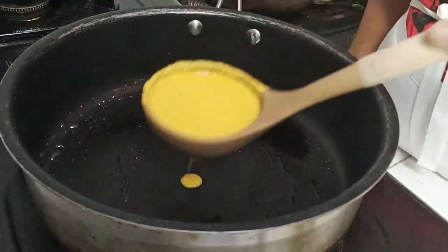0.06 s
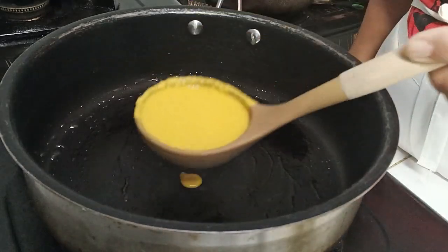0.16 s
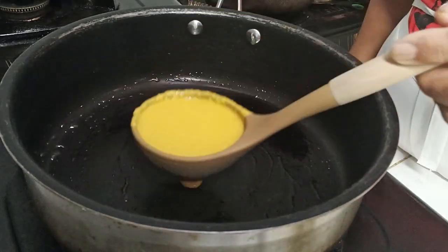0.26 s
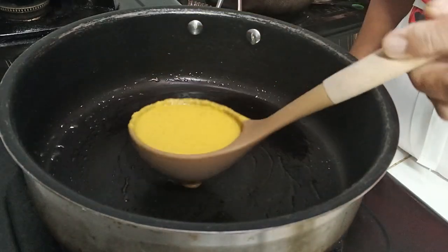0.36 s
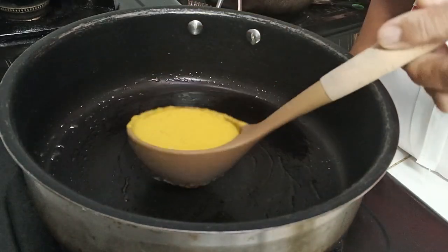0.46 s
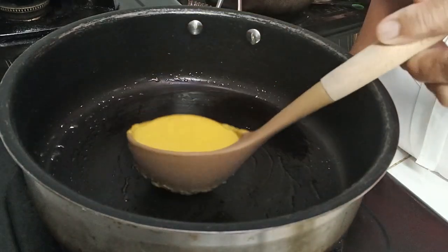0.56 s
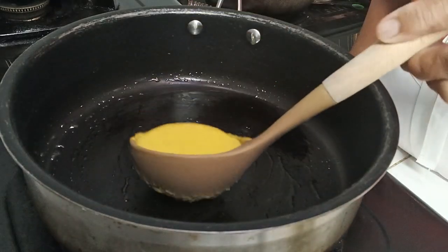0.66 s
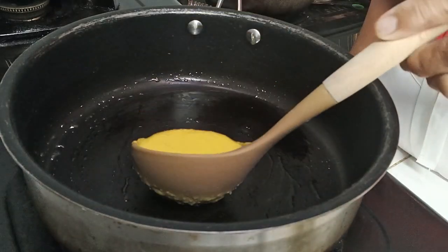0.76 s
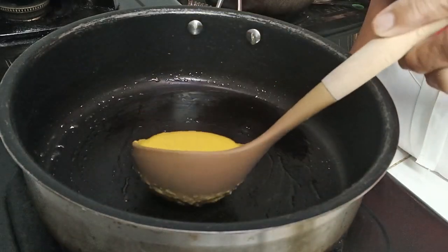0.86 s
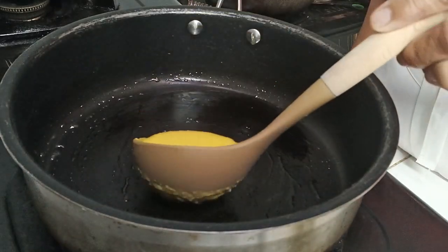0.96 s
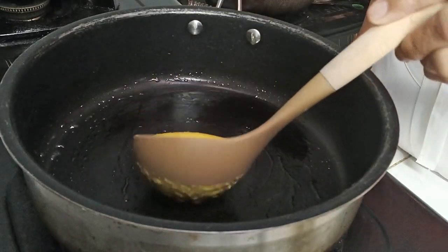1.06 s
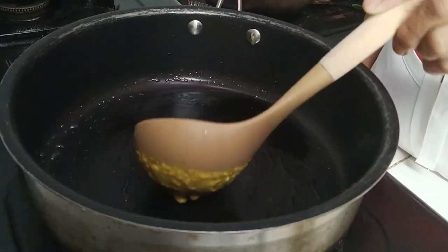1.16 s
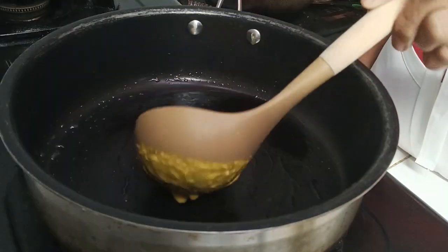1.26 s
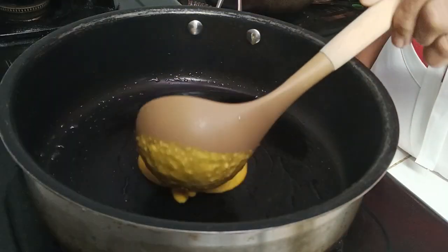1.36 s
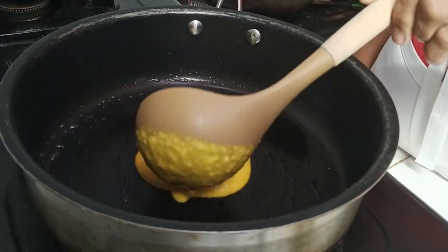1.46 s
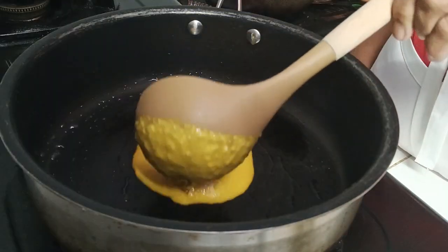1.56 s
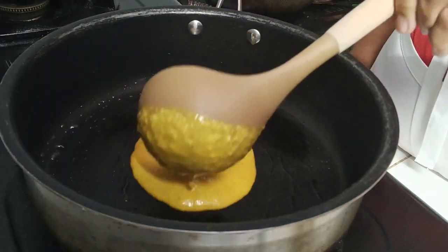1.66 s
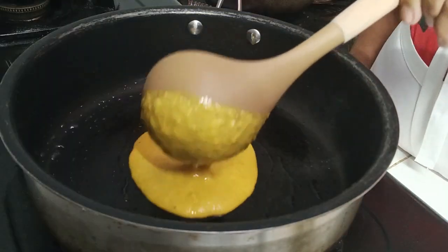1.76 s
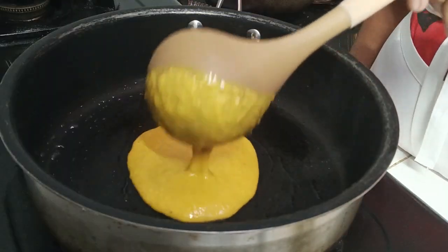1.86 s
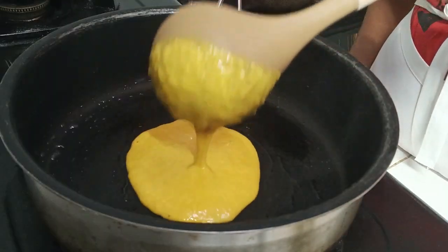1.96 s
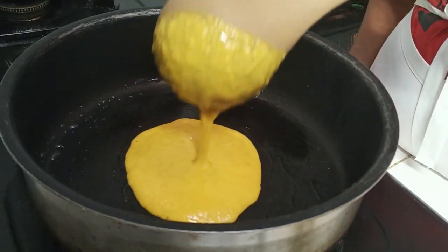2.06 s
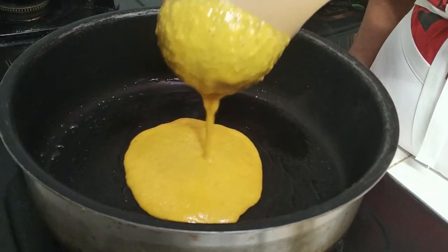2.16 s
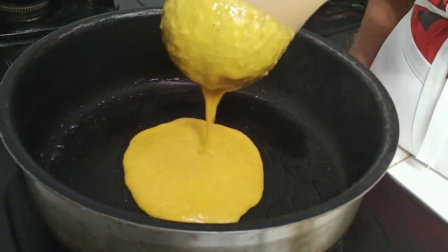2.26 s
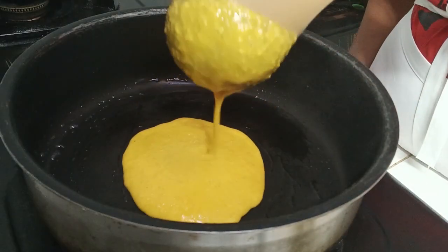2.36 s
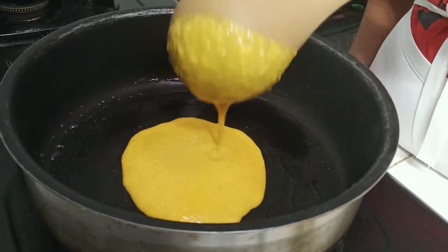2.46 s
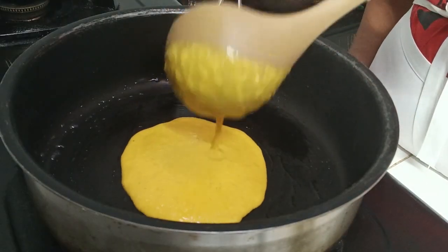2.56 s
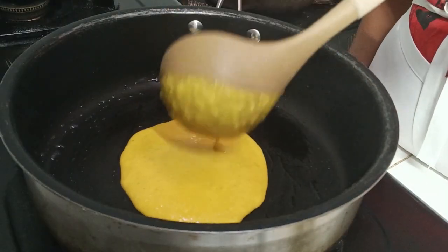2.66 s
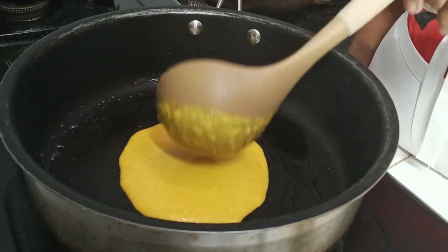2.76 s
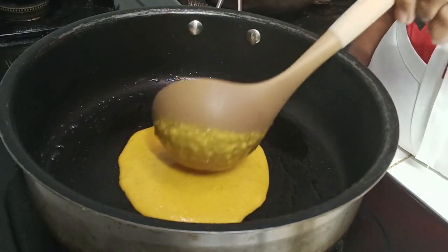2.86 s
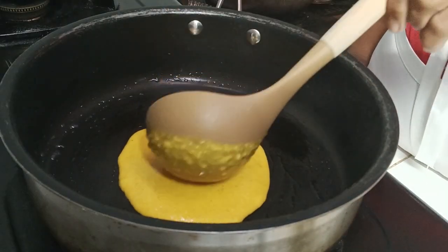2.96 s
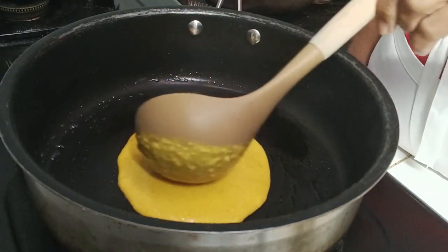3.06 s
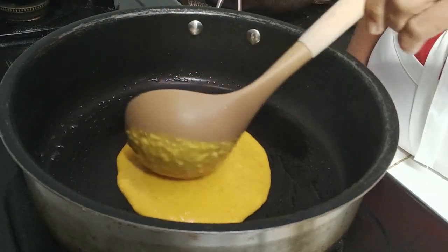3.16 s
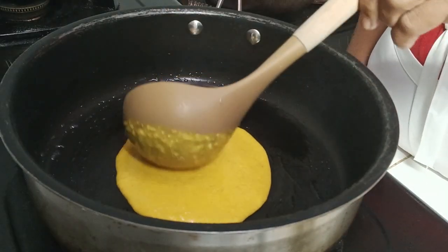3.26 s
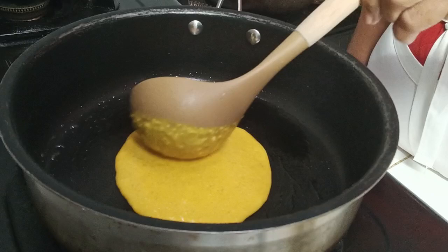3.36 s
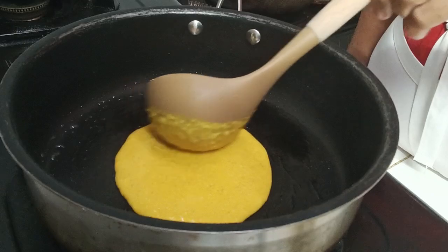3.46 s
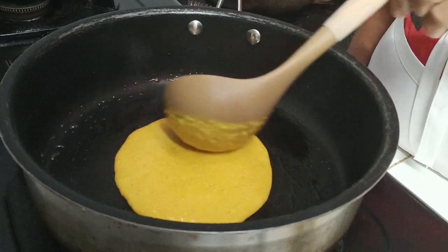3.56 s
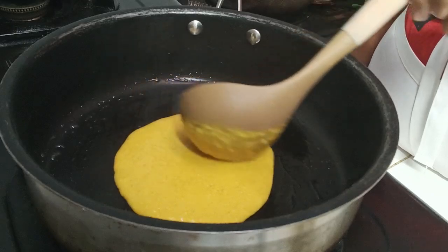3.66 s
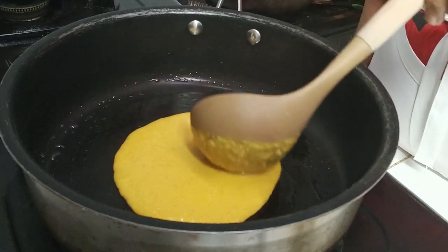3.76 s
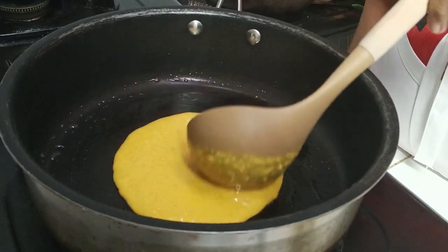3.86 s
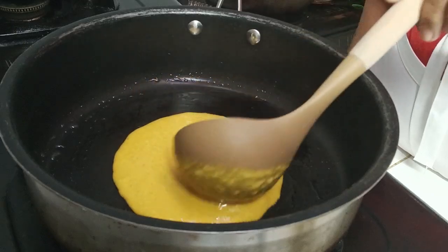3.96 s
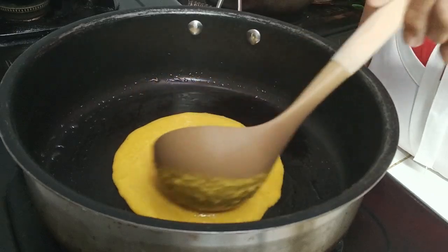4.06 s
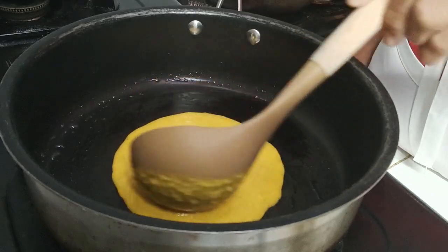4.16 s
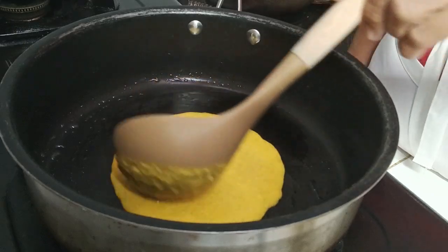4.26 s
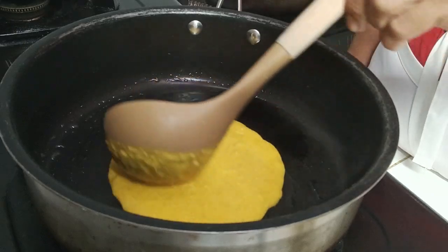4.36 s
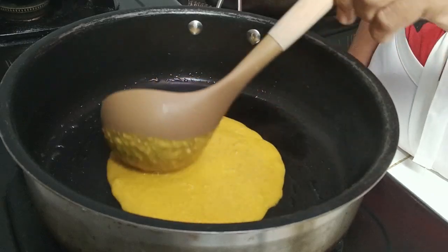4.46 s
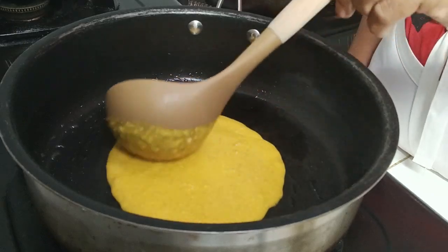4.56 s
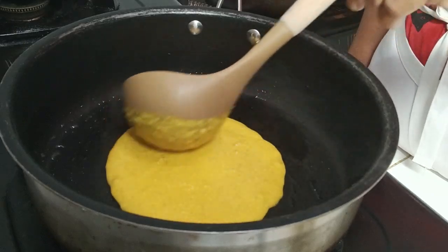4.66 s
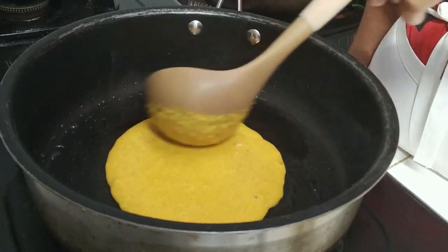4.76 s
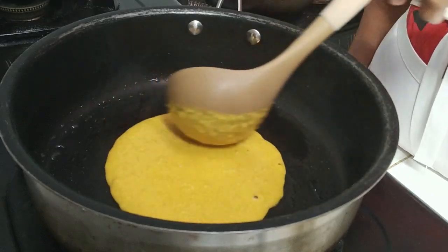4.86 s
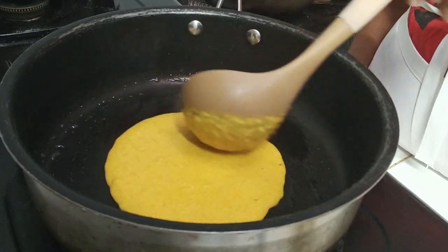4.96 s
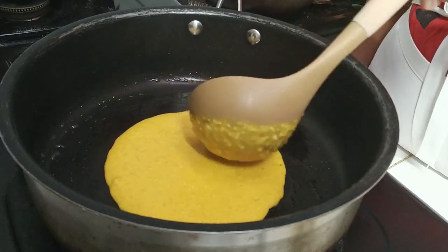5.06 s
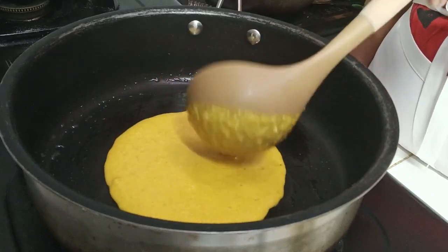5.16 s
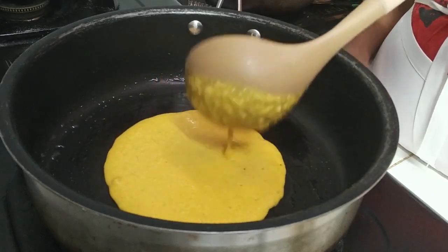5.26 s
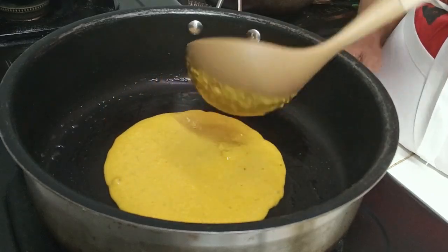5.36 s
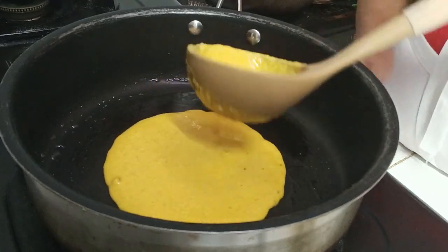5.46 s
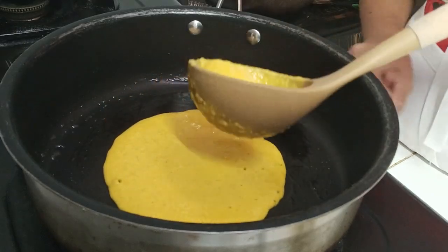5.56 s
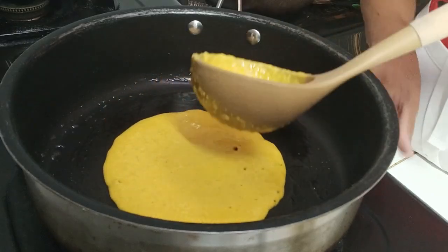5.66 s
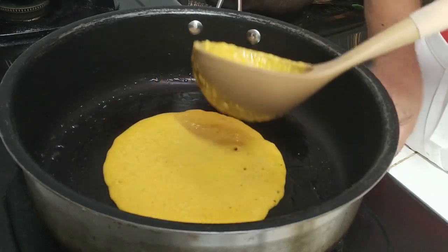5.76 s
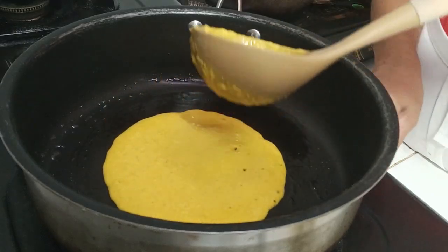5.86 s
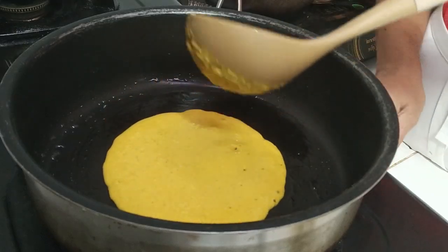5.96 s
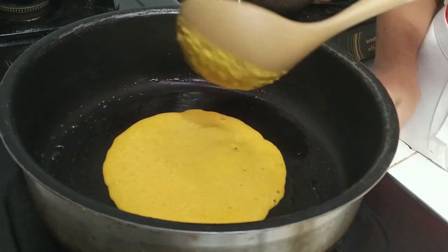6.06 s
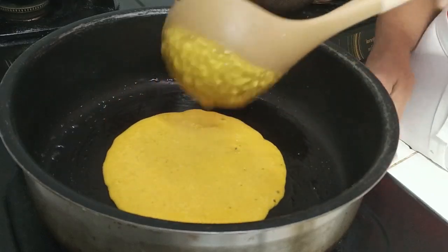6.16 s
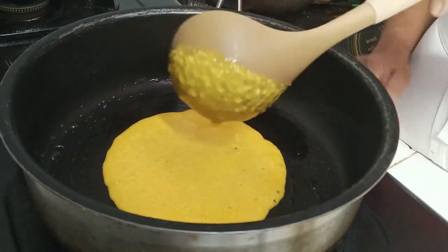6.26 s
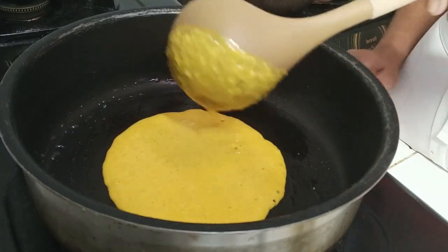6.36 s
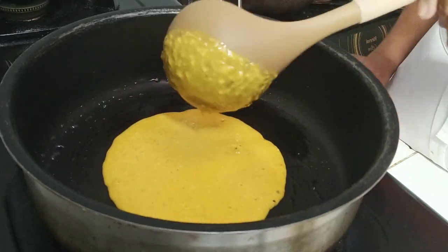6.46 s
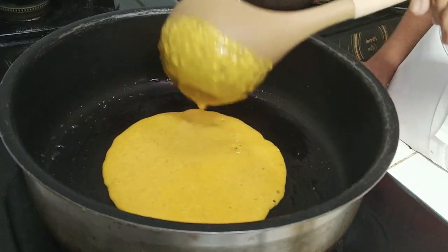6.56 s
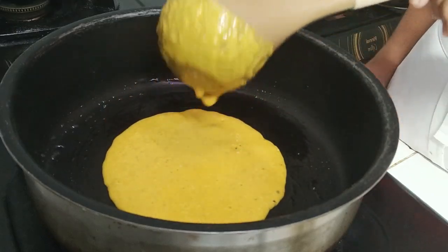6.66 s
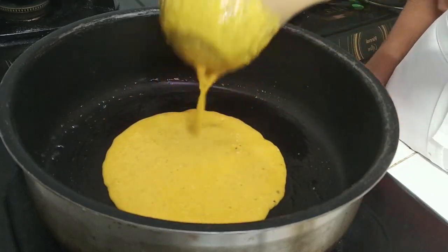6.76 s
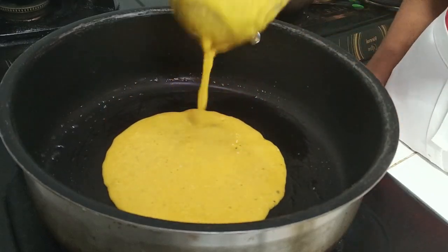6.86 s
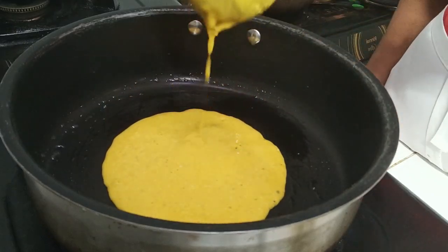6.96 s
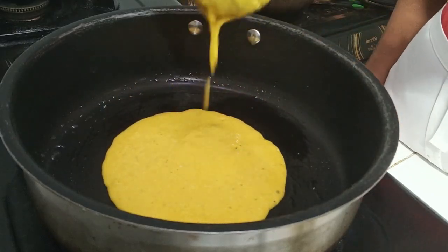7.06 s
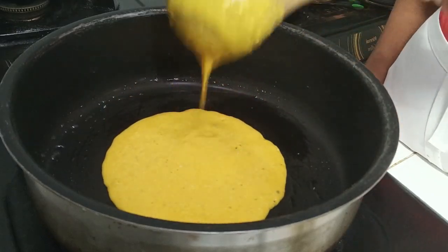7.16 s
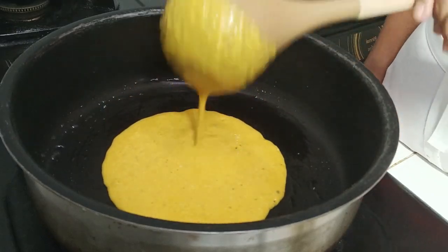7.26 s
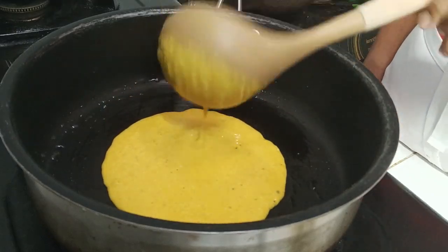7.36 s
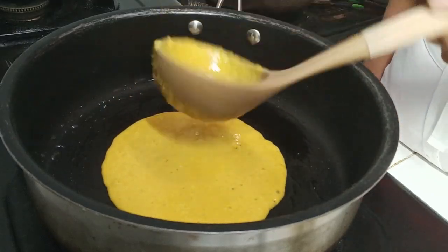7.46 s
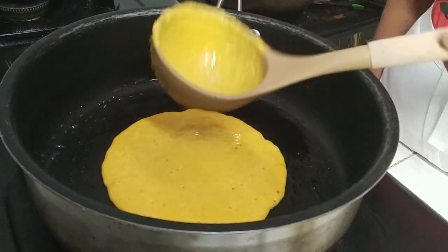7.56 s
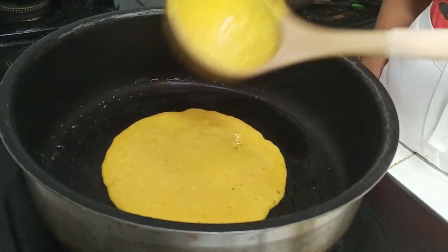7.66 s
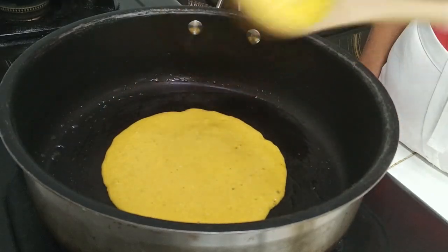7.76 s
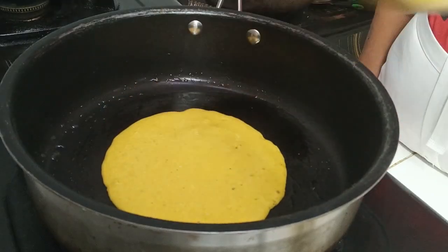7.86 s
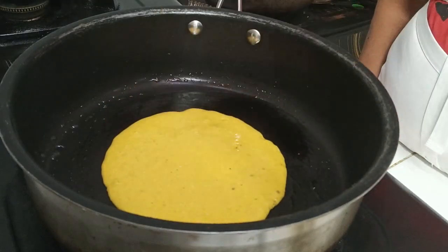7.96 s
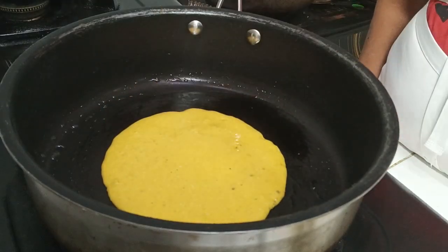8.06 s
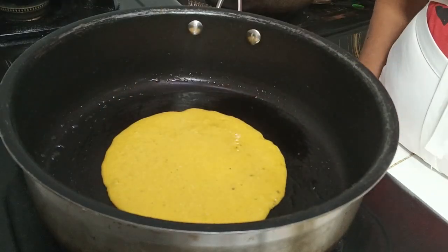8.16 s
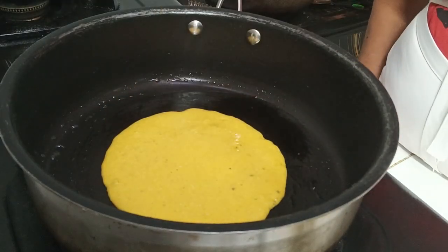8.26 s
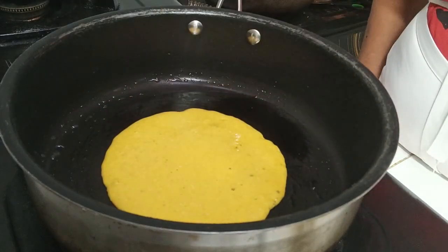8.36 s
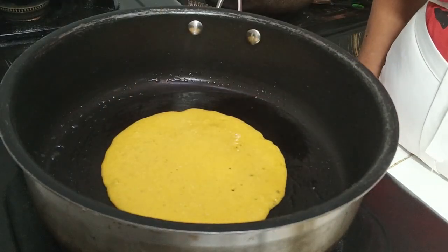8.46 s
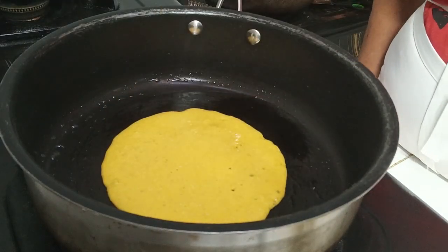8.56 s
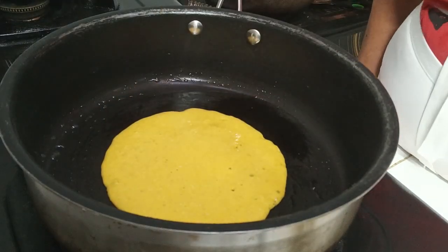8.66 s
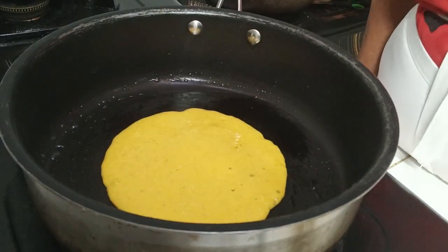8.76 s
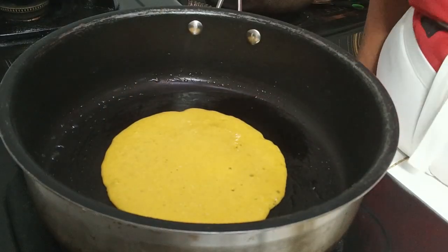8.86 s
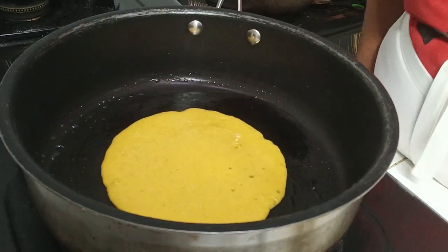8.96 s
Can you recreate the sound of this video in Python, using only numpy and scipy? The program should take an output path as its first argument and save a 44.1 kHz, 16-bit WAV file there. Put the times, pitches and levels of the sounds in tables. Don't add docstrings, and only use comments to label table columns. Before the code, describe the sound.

Close, bright frying: a ringing drip hiss, a louder muffled surge as batter lands, then long crackling fizz over a faint distant motorbike.

```python
import sys
import numpy as np
from scipy import signal
from scipy.fft import rfft, irfft
from scipy.io import wavfile
from scipy.ndimage import uniform_filter1d

SR = 44100
rng = np.random.default_rng(int(sys.argv[2]) if len(sys.argv) > 2 else 0)


def voltage_ratio(decibels):
    exponent = np.asarray(decibels, float) / 20
    return 10 ** exponent


def master(y):
    cut = np.clip(np.atleast_2d(y).T, -1, 1)
    pcm = np.round(cut * 32767)
    wavfile.write(sys.argv[1], SR, pcm.astype(np.int16))


N = 397202
T = np.arange(N) / SR

# pitch_hz, level_db (per Hz)
ROOM_RUMBLE = [(15, -42), (25, -21), (43, -7), (113, 3.5), (205, 3), (303, -7.5), (394, -9), (452, -14.5),
               (500, -1), (650, -43), (1100, -120)]
# start_s, firing_hz, level_db
MOTORBIKE = [(0, 17.7, -64.5), (4.1, 21.6, -80), (4.4, 23, -62), (4.75, 23, -78), (5.9, 21.3, -60.5),
             (6.1, 25, -60.5), (6.6, 22, -62), (6.75, 20.7, -73), (7.5, 21.7, -64.5), (8, 24, -63.5),
             (8.6, 22, -52.5), (8.78, 25, -58), (9.01, 24.8, -54)]
# multiple of the firing rate, level_db
MOTORBIKE_TONES = [(4, -6.5), (5, 0), (6, 1.5), (8, -11)]
# pitch_hz, level_db
LEFT_COLOUR = [(200, -12.5), (320, -19.5), (480, -15.5), (650, -6), (1000, -15.5), (1300, -3.5),
               (1800, -3.5), (2500, -1), (4000, -2.5), (6500, -1), (7600, -9.5), (10300, -14),
               (12400, -7.5), (13900, -6)]
RIGHT_COLOUR = [(200, -31), (430, -17.5), (620, -13.5), (1500, -10), (2600, -4), (3500, -12), (5000, 1),
                (6600, 14), (7500, 6.5), (8300, -5.5), (10500, -10.5), (13700, -11)]
# pitch_hz, left_db, right_db
PORT_PEAK = [(14250, 1, 4), (14650, 10, 14)]
# pitch_hz, width_hz, level_db (re the direct sound)
BOWL_AIR = [(406.7, 24, 3), (835, 40, -1), (1215, 45, -3), (2760, 40, -4)]
PAN_PITCHES = [1017, 1287, 2094, 2160, 2538, 2640, 2783, 3030, 3690, 3822, 4265, 4543, 4920, 5480, 5740,
               5890, 7070]
# level_db, fade_60db_s
PAN_RINGS = [(-11, 0.21), (-7.5, 0.15), (-7, 0.11), (6, 0.037), (-4, 0.24), (-6, 0.24), (-3.5, .06),
             (-5, 0.11), (-0.5, 0.051), (-10, 0.088), (-3, 0.075), (-11, 0.16), (-5.5, 0.16), (-4, 0.068),
             (-5, 0.055), (-29, 0.08), (-29, 0.045)]
# start_s, level_db
HUM_BLOWS = [(.08, -43), (.17, -45), (.29, -42), (.44, -53), (.56, -50), (1.22, -46)]
# start_s, level_db
CUP_LEVEL = [
    (.871, -66),
    (.885, -42.5),
    (.97, -37.5),
    (1.2, -38),
    (1.41, -43.5),
    (1.47, -52),
    (5.3, -63),
    (5.9, -62),
    (6.1, -90),
]
# pitch_hz, width_hz, level_db
CUP_AIR = [(590, 70, -5), (925, 110, 0), (2290, 30, -9), (2670, 90, -5)]
# start_s, push_db, crack_db (re push)
SPAT_DROPLETS = [(1.075, -36, -21), (1.19, -23, -21), (1.4768, -13, -15), (1.897, -34, -18),
                 (2.403, -28, -21), (2.522, -34, -21), (2.61, -34, -17), (2.937, -26, -19),
                 (4.159, -29, -21), (4.639, -33, -21), (4.713, -37, -21), (5.675, -41, -21),
                 (5.987, -27, -20), (6.897, -17, -19), (8.504, -6, 5)]
# start_s, right_peak_db, left_db (re right)
BIG_POPS = [(0.3352, -11.5, -12), (0.4829, -7.5, -9), (0.588, -31, -19), (0.634, -7.5, -9),
            (0.738, -10, -22), (0.8, -26, -27), (0.885, -8, -15), (1.4041, -13, -16), (1.6611, -22, -14),
            (3.0398, -24, -15), (6.389, -13, -16), (4.3211, -26, -34), (4.9052, -7.5, -18),
            (5.0537, -20, 1), (5.102, -12, -21), (6.2313, -11, -6), (6.376, -6, -21), (6.4046, -3, -24),
            (6.494, -8, -18), (6.5126, -12, -7), (6.534, -6.5, -13), (6.582, -4, -16), (6.6195, -8.5, -14),
            (7.4432, -12, -22), (7.5223, -20, -14), (7.7486, -11, -12), (7.8953, -13, -20),
            (8.1251, -13.5, -9), (8.34, -16, -9), (8.7452, -14, -8)]
# low_hz, high_hz
BUBBLE_RANGES = [
    (4500, 9000),
    (220, 1400),
    (1400, 4500),
    (9000, 17500),
]
# start_s, fizz_db
VIGOUR_CURVE = [(0.0, -71), (0.02, -46), (0.05, -36), (0.15, -30.5), (0.5, -34.5), (0.85, -28.5),
                (1.18, -25), (1.39, -26.5), (1.49, -34.5), (1.7, -29), (2.2, -30), (3.3, -32.5), (3.7, -30),
                (5.4, -31.5), (6.5, -32), (7.1, -37.5), (7.8, -36.5), (9.01, -38)]
# start_s, sag_db, refill_s
VENT_LULLS = [(.19, 7.5, 0.12), (.345, 8, 0.05), (.52, 4, 0.21), (.64, 10, 0.017), (.745, 6, 0.023),
              (.81, 4.5, 0.036), (1.62, 1, .05), (1.782, 2.5, 0.21), (2.5, 0, 0.18), (2.74, 4.5, 0.036),
              (3.11, 6, 0.042), (3.32, 2.5, 0.08), (3.41, 4, .15), (4.01, 3, 0.19), (4.36, 2.5, 0.12),
              (4.565, 6.5, 0.092), (4.7, 4, 0.19), (4.96, 1.5, 0.075), (5.128, 2, 0.21), (5.611, 4.5, 0.19),
              (5.997, 11, 0.12), (6.266, 6, .06), (6.67, 2.5, 0.05), (6.88, 3.5, 0.13), (7.181, 5, 0.034),
              (7.4, -0.5, .04), (7.63, 0, 0.048), (7.858, 5, 0.38), (8.66, -0.5, 0.059),
              (8.755, 3.5, 0.072)]
# start_s, bare_share (0-1)
BARE_PAN = [(0, 0.4), (.82, 0.9), (.9, 0.1), (1.4, 0.4), (1.5, 0)]
# pitch_hz, level_db
ECHO_GAPS = [(500, -5), (1700, -6), (2100, 0), (2450, -9), (2800, -1), (3250, -9), (3650, 1), (4050, -8),
             (4550, 0), (5200, -6), (5700, 1), (9000, 0)]

LANDS_S, LANDING_S = 0.75, 0.21
LIFTS_S, LIFTING_S = 1.41, 0.07
CALM_START_S, CALM_END_S = 0.57, 4.9


def curve(table, column=1):
    rows = np.array(table)
    return np.interp(T, rows[:, 0], rows[:, column])


def rise(start_s, length_s):
    return np.clip((T - start_s) / length_s, 0, 1)


def unit(x):
    return x / np.sqrt(np.mean(np.mean(np.atleast_2d(x), axis=0) ** 2))


def colour(x, points):
    hz, db = np.transpose(points)
    grid_hz = np.maximum(np.fft.rfftfreq(4096, 1 / SR), 1)
    log_gain = np.interp(np.log(grid_hz), np.log(hz), db) * np.log(10) / 20
    cepstrum = irfft(log_gain)
    cepstrum[1:2048] *= 2
    cepstrum[2049:] = 0
    response = irfft(np.exp(rfft(cepstrum)))
    return signal.oaconvolve(x, response)[:N]


def band(x, edges_hz, order=3):
    return signal.sosfilt(signal.butter(order, edges_hz, "band", fs=SR, output="sos"), x)


def ring(x, hz, t60_s):
    pole = np.exp(2j * np.pi * hz / SR - np.log(1000) / (t60_s * SR))
    return signal.lfilter([1], [1, -pole], x).imag


def air_ring(x, hz, width_hz):
    return ring(x, hz, np.log(1000) / (np.pi * width_hz))


def fade(x, tau_s):
    return signal.lfilter([1], [1, -np.exp(-1 / (tau_s * SR))], x)


def late(x, delay_s):
    return np.roll(x, int(delay_s * SR))


def clicks(times_s, sizes):
    return np.bincount((np.asarray(times_s) * SR).astype(int), sizes, N)[:N]


def walk(rate_hz):
    hold = int(SR / rate_hz)
    held = np.repeat(rng.standard_normal(N // hold + 1), hold)
    return unit(uniform_filter1d(held, hold)[:N])


def way_left(x, wander):
    direct = late(x, 0.001 + 0.0001 * wander)
    off_wall = fade(late(direct, 0.001745), 0.00004)
    tail = rng.standard_normal(400) * np.exp(-np.arange(400) / (0.0038 * SR))
    scattered = signal.oaconvolve(direct, tail / np.linalg.norm(tail))[:N]
    return direct + 0.36 * off_wall / 2 + voltage_ratio(-4) * scattered


def port(x, points, side):
    last_db = points[-1][1]
    peak = [(row[0], last_db + row[1 + side]) for row in PORT_PEAK]
    return colour(x, list(points) + peak)


def ports(spots):
    wanders = np.linspace(-1, 1, len(spots)) * (len(spots) > 1)
    left = sum(way_left(x, wander) for x, wander in zip(spots, wanders))
    bowl = 0
    for k, (hz, width_hz, db) in enumerate(BOWL_AIR):
        gain = (-1) ** k * voltage_ratio(db) * 2 * np.pi * width_hz / SR
        bowl = bowl + gain * air_ring(left, hz, width_hz)
    return np.array([port(left + bowl, LEFT_COLOUR, side=0), port(sum(spots), RIGHT_COLOUR, side=1)])


def lulls():
    t = T[::64]
    sag_db = 0
    for start_s, db, refill_s in VENT_LULLS:
        shutting = np.clip((t - start_s) / 0.034 + 0.5, 0, 1)
        refilling = np.exp(-(np.maximum(t - start_s, 0) / refill_s) ** 2)
        sag_db = sag_db + db * shutting * refilling
    return np.interp(T, t, sag_db)


def kitchen():
    shared, left, right = rng.standard_normal((3, N))
    rumble = unit(np.array([colour(0.097 * shared + own, ROOM_RUMBLE) for own in (left, right)]))
    turns = np.cumsum(curve(MOTORBIKE) * (1 + 0.0171 * walk(10))) / SR
    bike = 0
    for multiple, db in MOTORBIKE_TONES:
        bike = bike + voltage_ratio(db + 2.4 * walk(8)) * np.sin(2 * np.pi * multiple * turns)
    low = voltage_ratio(-63 + 2 * walk(3.02)) * rumble + voltage_ratio(curve(MOTORBIKE, column=2)) * bike
    side_db = np.array([[4.75], [-4.75]])
    return low * voltage_ratio(side_db - 0.4 * lulls())


def hum_level():
    rise_s, fall_db_s = 0.03, 183
    level = 0
    for hit_s, db in HUM_BLOWS:
        dying = voltage_ratio(db - fall_db_s * np.maximum(T - hit_s, 0))
        level = level + dying * rise(hit_s - rise_s, rise_s)
    held_from_s, held_to_s, held_db = 0.744, 1.23, -41.5
    held = voltage_ratio(held_db - fall_db_s * np.maximum(T - held_to_s, 0))
    return level + held * rise(held_from_s - rise_s, rise_s)


def pan(spots):
    drive = band(np.array([sum(spots[::2]), sum(spots[1:])]), (350, 12000))
    metal = 0
    for hz, (db, t60_s) in zip(PAN_PITCHES, PAN_RINGS):
        metal = metal + voltage_ratio(db) * unit(ring(drive, hz, t60_s))
    hum = ring(drive[0], 1914, 0.8)
    hum = hum / (np.abs(signal.hilbert(hum)) + 0.33 * hum.std())
    cup = sum(voltage_ratio(db) * unit(air_ring(drive, hz, width_hz)) for hz, width_hz, db in CUP_AIR)

    ring_db = curve(VIGOUR_CURVE) - 0.64 * lulls() - 15
    ring_db = ring_db - 2 * rise(LANDS_S - 0.15, 0.17) - 25 * rise(LIFTS_S, LIFTING_S)
    damped_db = -60 * np.maximum(T - 1.3, 0)
    ringing = voltage_ratio(damped_db) * (voltage_ratio(ring_db) * metal + voltage_ratio(4.5) * hum_level() * hum)
    cupped = voltage_ratio(curve(CUP_LEVEL)) * np.array([late(cup[0], 0.001), cup[1]])
    return (ringing + cupped) * voltage_ratio(np.array([[3.0], [-5.0]]))


def puffs():
    hit_s, db, crack_db = np.transpose(SPAT_DROPLETS)
    push = -fade(uniform_filter1d(clicks(hit_s, voltage_ratio(db)), size=8), 0.001)
    swing = signal.sosfilt(signal.butter(2, 85, "high", fs=SR, output="sos"), push)
    splat_power = fade(clicks(hit_s - 0.0004, voltage_ratio(2 * (db + crack_db))), 0.0002)
    splat = np.sqrt(splat_power) * rng.standard_normal(N)
    left, right = ports([splat])
    crack = voltage_ratio(db + crack_db)
    snap = clicks(hit_s - 0.00032, crack) - clicks(hit_s - 0.000275, crack)
    right = voltage_ratio(-7) * right + voltage_ratio(-10) * splat + voltage_ratio(-5) * snap
    return np.array([voltage_ratio(-18) * left + 0.024 * swing, right + swing])


def pops():
    pop_s, db, left_db = np.transpose(BIG_POPS)
    gap, size, side = rng.random((400, 3)).T
    spits_due = np.cumsum(12 * (1 + 1.2 * rise(CALM_END_S, 1))) / SR
    spit_s = np.interp(np.cumsum(-np.log(gap)), spits_due, T)
    keep = spit_s < T[-1]
    spit_db = np.interp(spit_s, T, curve(VIGOUR_CURVE) - lulls()) + 14.5 - 5 * np.log(size)
    pop_s = np.r_[pop_s, spit_s[keep]]
    db = np.minimum(np.r_[db, np.minimum(spit_db, -15)[keep]], -6)
    left_db = np.r_[left_db, -11.5 + 8 * (side[keep] - 0.5)]
    left = ports([-clicks(pop_s, voltage_ratio(db + left_db + 16))])[0]
    right = port(clicks(pop_s, voltage_ratio(db + 7.5)), RIGHT_COLOUR, side=1)
    return band(np.array([left, right]), (2000, 19000), order=1)


def steam():
    bursts_per_s, vents_per_s = 300, 12
    shut = rng.random(N) < vents_per_s / SR
    calm = rise(CALM_START_S, 0.2) - rise(CALM_END_S, 0.51)
    uneven = 1 - (1 - 0.26) * calm
    vent_db = walk(45) - 0.9 * fade(shut * rng.exponential(size=N), 0.025)
    vent = voltage_ratio(uneven * vent_db)
    spots = []
    for chance in rng.random((6, 12000, 3)):
        times_s = np.cumsum(-np.log(chance[:, 0])) / bursts_per_s
        sizes = voltage_ratio(np.minimum(-4 * np.log(chance[:, 1]), 15)) * np.sign(chance[:, 2] - 0.7)
        keep = times_s < N / SR
        bursts = clicks(times_s[keep], sizes[keep])
        spots.append(vent * (unit(bursts) + rng.standard_normal(N)))
    return spots


def frying(fizz):
    bare = np.clip(curve(BARE_PAN), 0, 1)
    gappy = np.array([colour(side, ECHO_GAPS) for side in fizz])
    fizz = (1 - bare) * fizz + bare * gappy
    landed, lifted = rise(LANDS_S, LANDING_S), rise(LIFTS_S, LIFTING_S)
    wet = np.exp(-np.maximum(T - LIFTS_S, 0) / 1.8)
    sag_db = lulls()
    sag_share = (0.86, 1, 0.83, 0.85)
    drip_db, pour_db = (-30, -7, -7), (-12.5, -5.5, -7)
    spread_db, wet_db = (-13.5, -8.5, -1.5), (-2, 0.5, -3)
    out = 0
    for k, edges_hz in enumerate(BUBBLE_RANGES):
        db = curve(VIGOUR_CURVE) - sag_share[k] * sag_db + 0.89 * walk(25)
        if k > 0:
            drip, pour = drip_db[k - 1], pour_db[k - 1]
            spread = spread_db[k - 1] + wet_db[k - 1] * wet
            db = db + drip + landed * (pour - drip) + lifted * (spread - pour)
        out = out + voltage_ratio(db) * unit(band(fizz, edges_hz))
    return out


def scene():
    spots = steam()
    return kitchen() + pan(spots) + puffs() + pops() + frying(ports(spots))


def roll_off(x):
    return signal.sosfilt(signal.butter(12, 17020, fs=SR, output="sos"), x)


def record(dry):
    too_loud = np.maximum(np.abs(dry).max(axis=0) - 0.5, 0)
    duck_db = -np.minimum(late(fade(too_loud, 0.047), 0.0035) * 12, 10)
    top_cut = signal.ellip(10, 0.3, 70, 15950, fs=SR, output="sos")
    mix = np.clip(signal.sosfilt(top_cut, dry * voltage_ratio(duck_db)), -0.84, 0.84)
    return roll_off(mix)


dry = scene()
out = record(dry)
master(out)
```